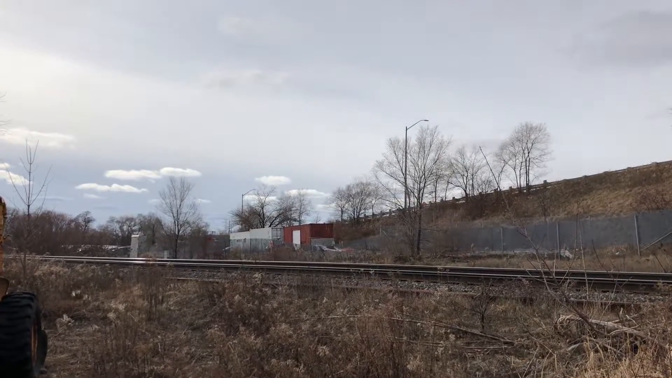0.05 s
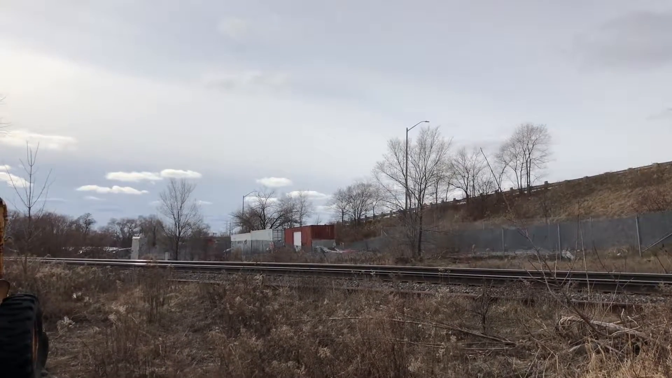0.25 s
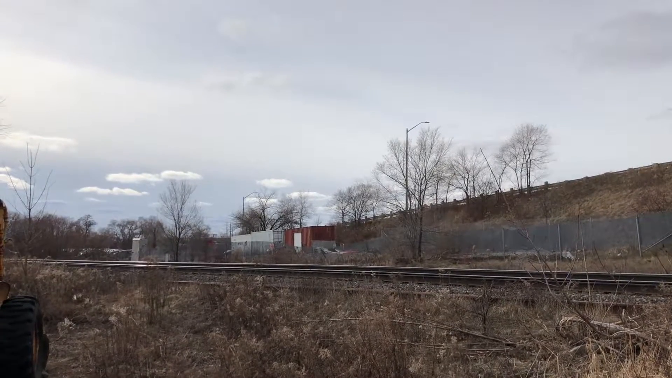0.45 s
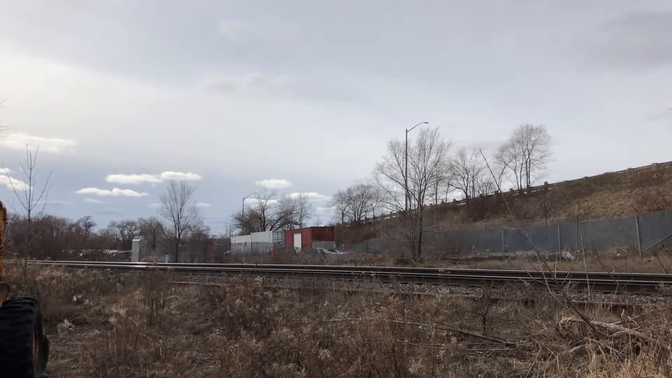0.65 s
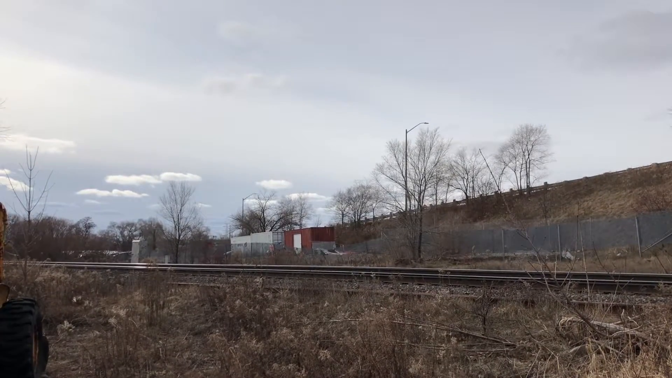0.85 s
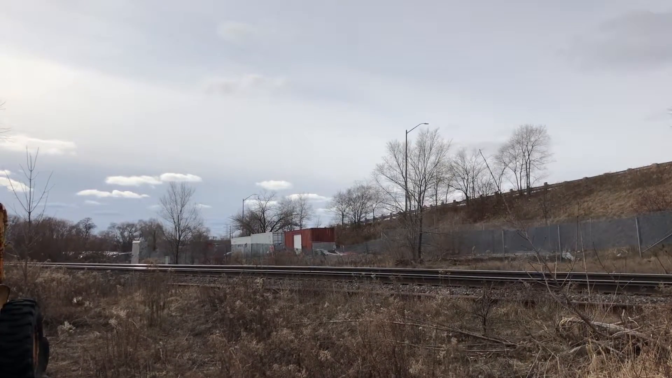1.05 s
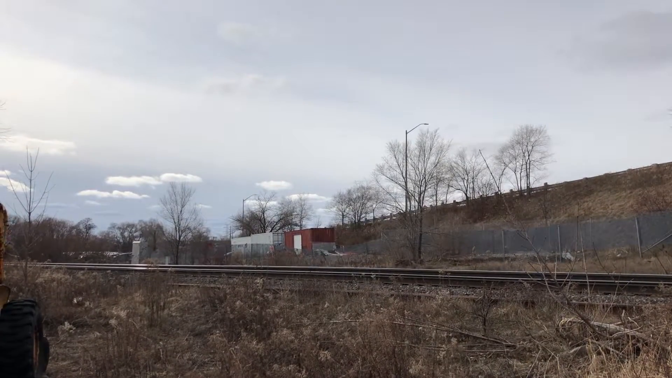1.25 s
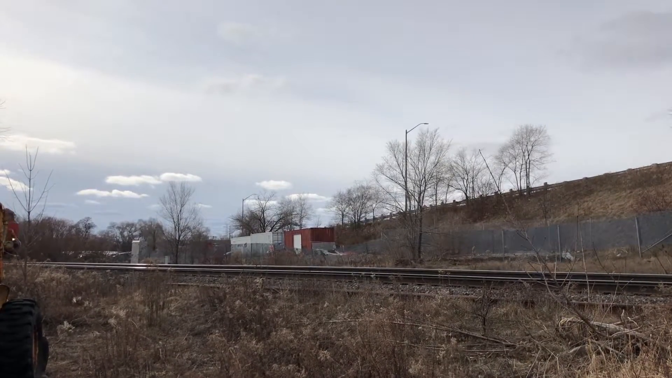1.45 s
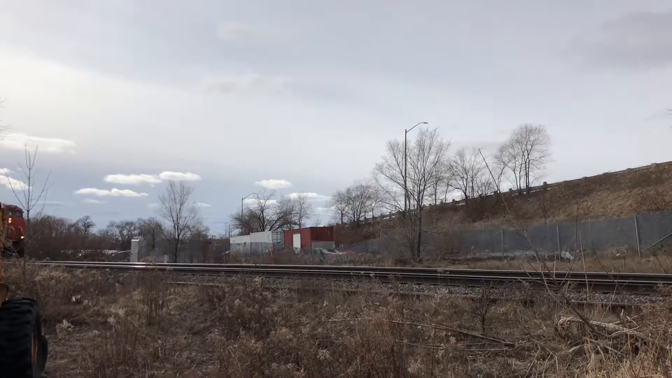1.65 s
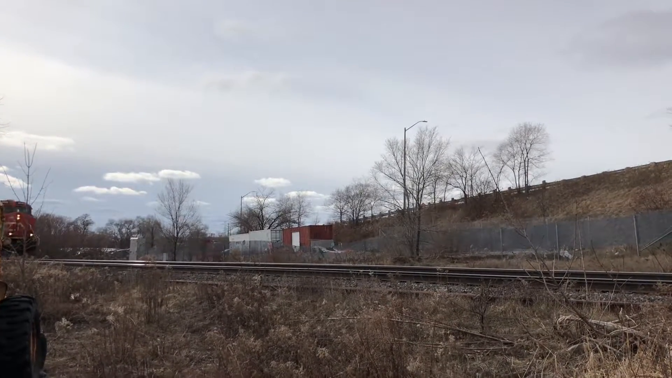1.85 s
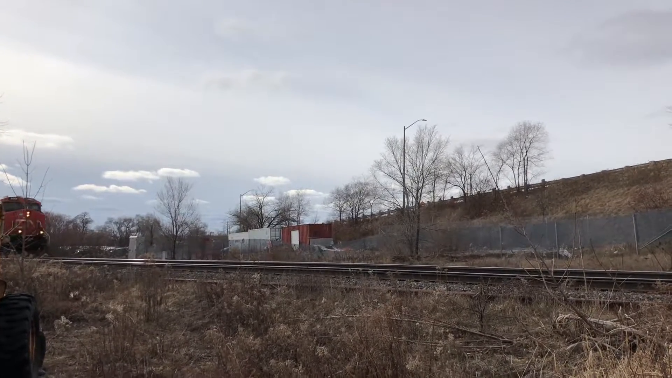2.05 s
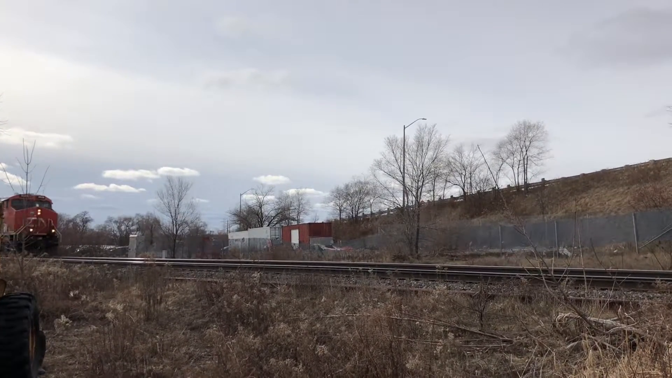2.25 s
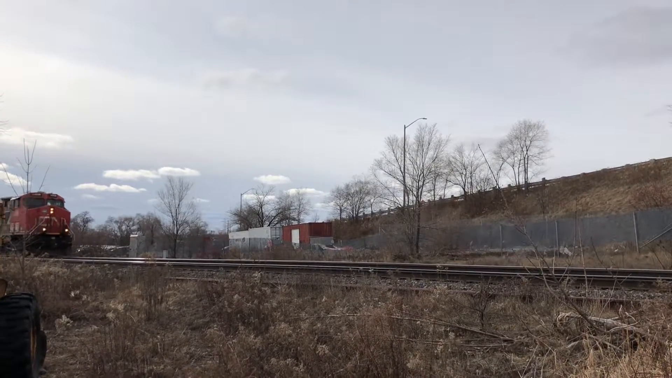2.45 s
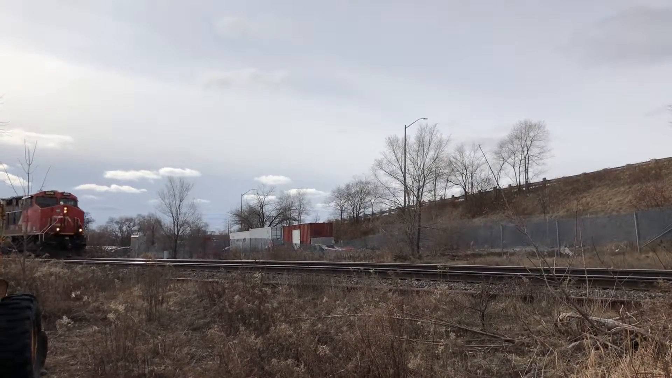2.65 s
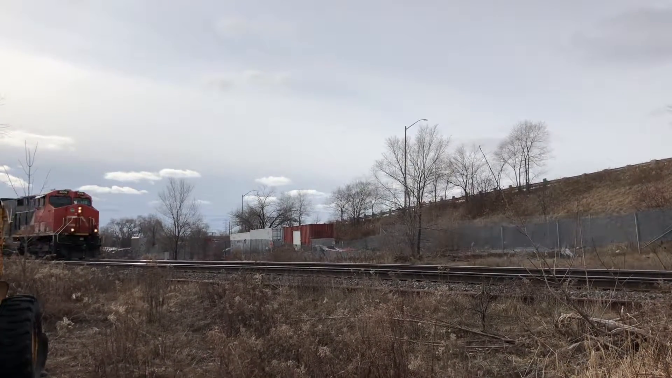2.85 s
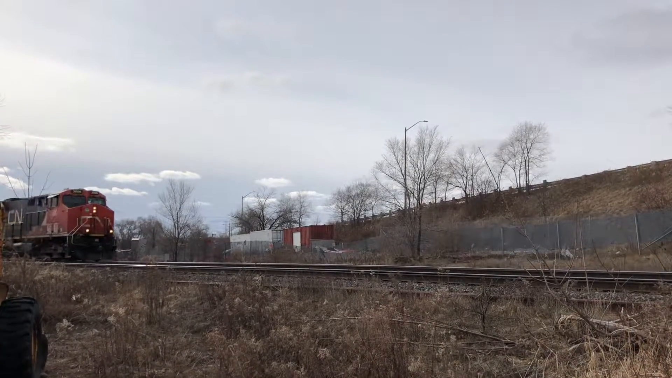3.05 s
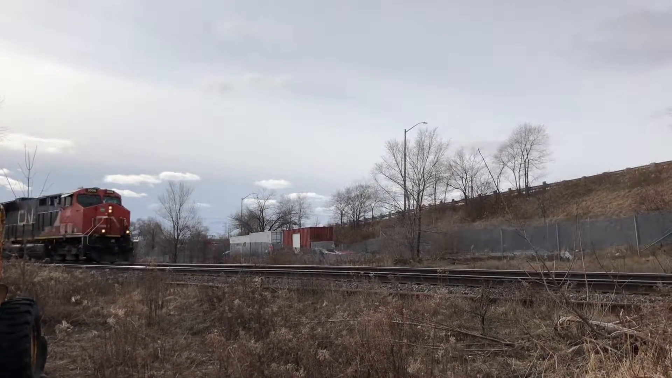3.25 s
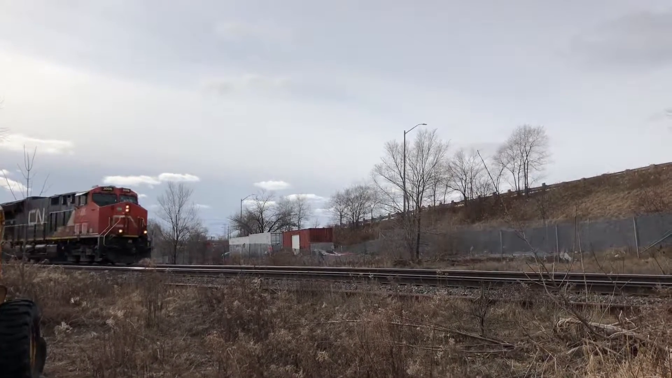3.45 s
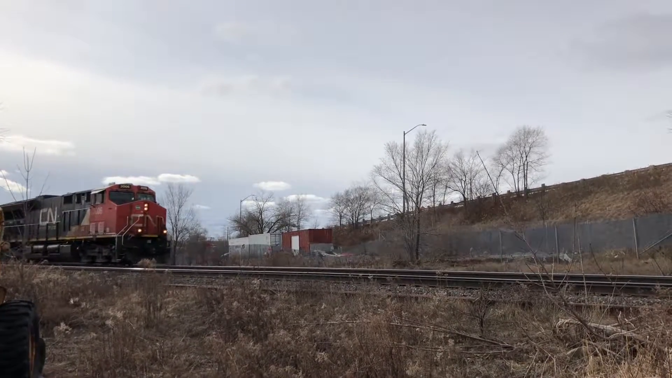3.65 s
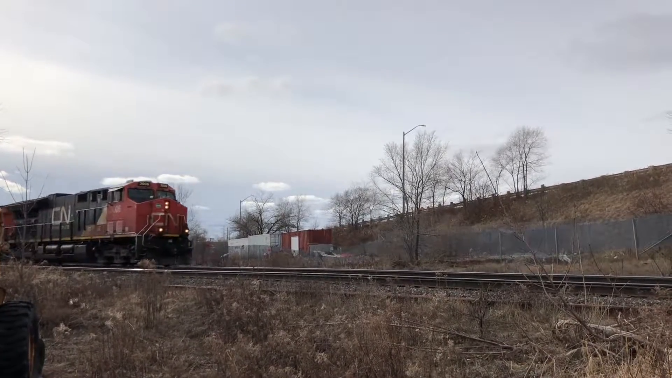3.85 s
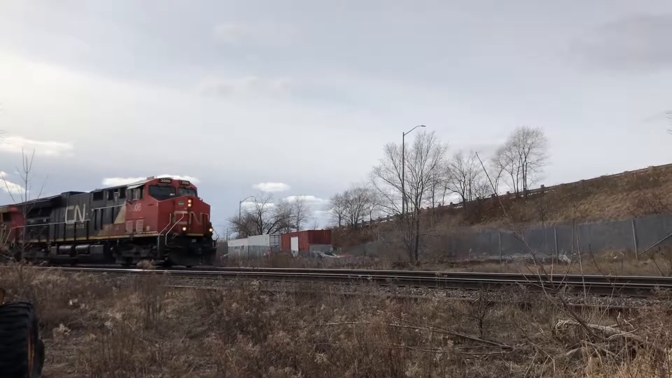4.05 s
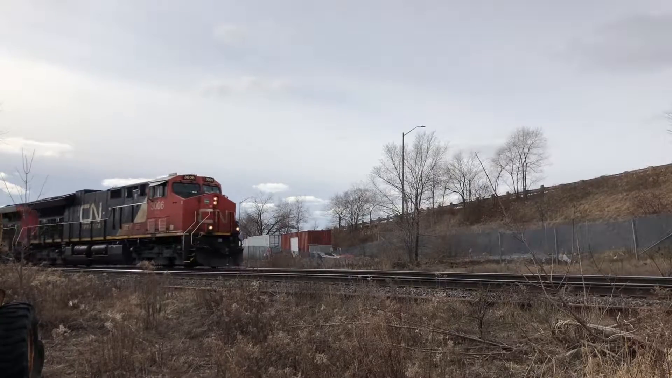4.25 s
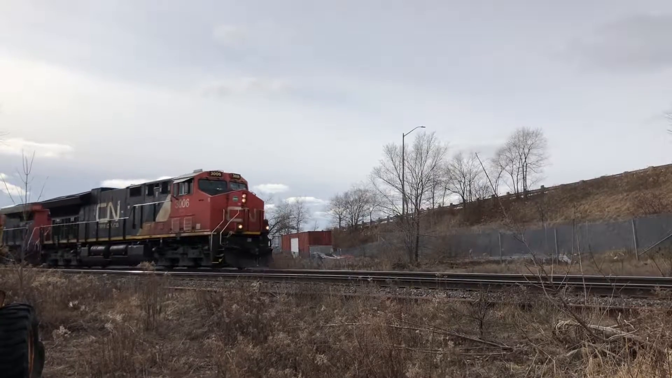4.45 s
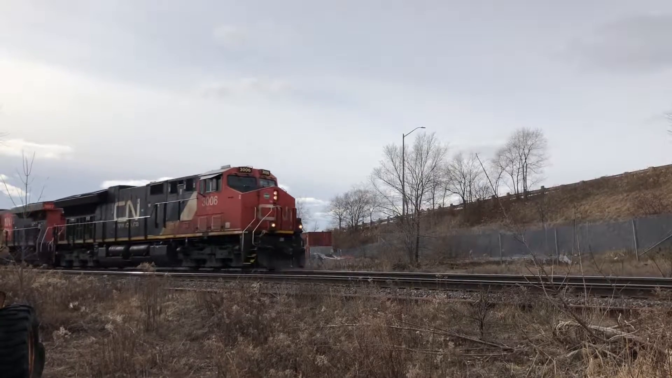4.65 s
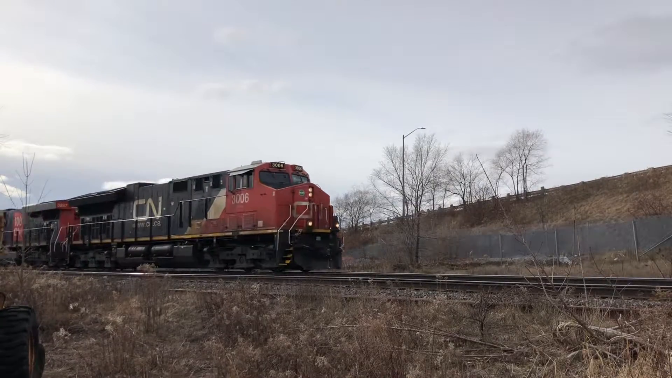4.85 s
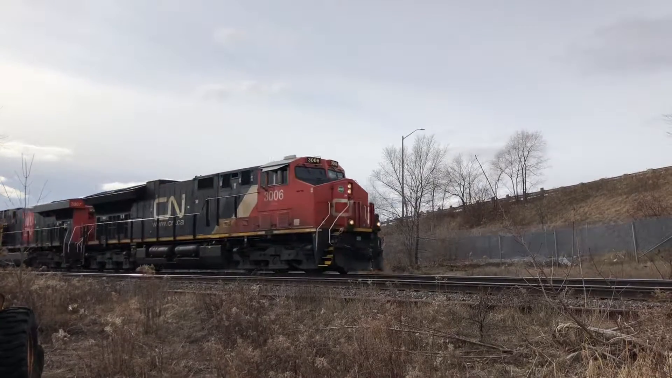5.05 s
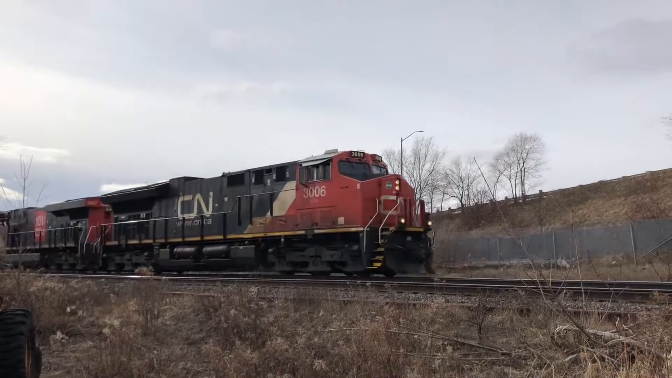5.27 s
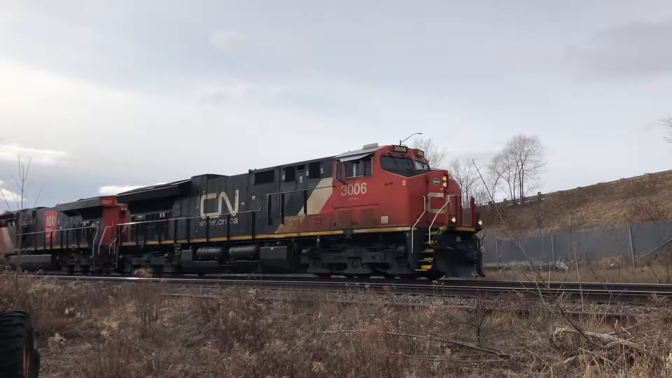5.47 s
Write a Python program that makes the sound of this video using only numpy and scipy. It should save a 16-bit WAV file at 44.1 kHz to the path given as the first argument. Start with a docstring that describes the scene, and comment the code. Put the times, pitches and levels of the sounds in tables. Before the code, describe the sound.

From 0 s, two diesel freight locomotives throb down the track, slightly muffled by cover until about 0.6 s. Their low, uneven exhausts run at different speeds and beat together. Over them lie a fluttering, several-toned blower whine, mostly mid to high, and a broad roar of air. A soft, breathy puff close by begins around 0.4 s, peaks near 0.6 s and fades; at 0.9 s comes one short, hoarse squeak falling in pitch. A thin, very high hiss comes and goes, almost vanishing around 3 s and returning at 3.5 s. The whole train grows steadily louder and brighter, with the whine surging around 3.5 and 4.6 s. Wheel hiss and fine rattle rise fastest. Faint, very high squeals appear from 3.6 s, and bright rail scuffs cluster from 4.9 to 5.4 s. The open-air trackside sound ends at about 5.5 s, near its loudest, before the engine draws level.

```python
"""The throb of two diesel freight locomotives comes first, far down the track; under load they approach from cover.
The exhausts turn at different speeds and beat; blowers geared to the leading engine whine over a roar of air.
Most of it swells as the distance to the microphone shrinks, the hiss and rattle of steel wheels fastest.
Early on comes a soft puff of air, close by, then one hoarse squeak falls in pitch.
A thin high hiss comes and goes; later the wheels squeal faintly and scuff the rail.
"""
import sys
import numpy as np
from scipy import signal
from scipy.fft import rfft, irfft
from scipy.io import wavfile

SR = 44100
rng = np.random.default_rng(int(sys.argv[2]) if len(sys.argv) > 2 else 0)


def int16_out(signal):
    """Quantize to a 16-bit WAV file."""
    q = np.round(np.clip(np.atleast_2d(signal).T, -1, 1) * 32767)
    wavfile.write(sys.argv[1], SR, q.astype(np.int16))


N = 242991
TIME = np.arange(N) / SR

# Leading engine, settling under load. Each row: time in seconds, four-stroke cycles per second in Hz.
LEAD_SPEED = [(0, 7.86), (.8, 7.91), (1.6, 7.985), (5.5, 7.955)]
# Second engine, turning slower. Each row: time in seconds, four-stroke cycles per second in Hz.
TRAIL_SPEED = [(0, 6.89), (3, 6.895), (5.5, 6.86)]

# distance from microphone to track (m); blower level there (dB) and its loss over the ground (dB per metre)
TRACK_M, BLOWER_DB, BLOWER_LOSS_DB_PER_M = 15.33, -18.5, 0.0625


def engines(lead_db=-3, trail_db=-5.5, rumble_db=-11.0, trail_lag_db=-3, boom_hz=93, boom_width_hz=4, boom_db=-13):
    """Both exhausts, the turbulent rumble of their stacks and a surging boom; the farther engine grows more slowly."""
    # Leading exhaust's tones; twelve cylinders fire at multiple 12. Each row: multiple of cycle rate, level in dB.
    lead_orders = [(6, -30), (7, -38), (9, -27), (10, -33), (11, -29), (12, -22), (13, -30), (14, -33),
                   (15, -22), (16, -35), (17, -39), (18, -33), (19, -40), (20, -38), (21, -32), (22, -39),
                   (24, -42), (26, -38), (27, -34), (28, -35), (29, -39), (31, -47), (32, -46), (46, -47)]
    # Second exhaust's tones. Each row: multiple of cycle rate, level in dB.
    trail_orders = [(6, -36), (7, -36), (9, -27), (10, -34), (12, -28), (13, -34), (14, -32), (15, -25),
                    (17, -35), (18, -38), (19, -37), (20, -41), (21, -37), (30, -38), (31, -42)]
    # Spectrum of the stacks' rumble. Each row: frequency in Hz, relative level in dB per Hz.
    rumble_spectrum = [(15, -38), (33, -33), (45, -12), (70, -7.5), (100, 2.5), (135, -4), (180, -9.5),
                       (220, -6.5), (260, -15), (330, -11), (400, -18.5), (450, -52), (1200, -55.5)]
    # All the engine sound swells for a moment. One row: peak in seconds, half length in seconds, rise in dB.
    engine_swell = (3.33, 0.18, 1)
    track_db, shadow_db = -12, -0.5  # level at the distance of the track; shadow of the cover at the start

    lead = exhaust(LEAD_SPEED, lead_orders, waver=0.17, waver_hz=2.0, smear=0.8)
    trail = exhaust(TRAIL_SPEED, trail_orders, waver=0.22, waver_hz=1.5, smear=1.0)
    far = gain_of(trail_db) * trail + gain_of(boom_db) * fuzzy(boom_hz, boom_width_hz)
    far = far * gain_of(trail_lag_db * TIME / TIME[-1])
    rumble = coloured(rng.standard_normal(N) * throb(depth=0.51, order=3), rumble_spectrum)
    level_db = track_db + spreading() + swell(*engine_swell) + shadow_db * cover()
    return gain_of(level_db) * (gain_of(lead_db) * lead + far + gain_of(rumble_db) * rumble)


def exhaust(speed, orders, waver, waver_hz, smear):
    """Unequal cylinders repeat once a cycle, so multiples of the cycle rate sound; each wavers in the air."""
    # The upper tones rise and fall once.
    # One row: lowest multiple of cycle rate, peak in seconds, half length in seconds, rise in dB.
    bark_from, *bark = (25, 4.62, 0.83, 2.9)
    turns = np.cumsum(curve(speed)) / SR + rng.random()
    out = np.zeros(N)
    for order, db in orders:
        lag = smear * rng.random()  # pipes and ground echoes smear the pulses
        tone = np.exp(2j * np.pi * (order * turns + lag))
        wavering = 1 + waver * (drift(waver_hz) + 1j * drift(waver_hz))
        bark_db = swell(*bark) * (order >= bark_from)
        out += gain_of(db + bark_db) * (tone * wavering).real
    return evened(out)


def throb(depth, order):
    """Gas leaves the leading engine in puffs, a few to each cycle, so level pulses at that multiple."""
    return 1 + depth * np.cos(2 * np.pi * order * np.cumsum(curve(LEAD_SPEED)) / SR)


def blowers(flutter=0.39, flutter_hz=14, roar_db=-3, gust_db=0.76, gust_hz=13.0):
    """Blade tones follow the engine and flutter in moving air, in skirts of scattered sound, over airflow roar."""
    # Blade whine. Each row: multiple of blade rate, clean tone in dB, scattered skirt in dB,
    # skirt centre in Hz (at the engine's last speed), skirt width in Hz.
    whine_rows = [(1, -24, -28.5, 310, 18), (2, -18, -13, 655, 83), (3, -13, -12.5, 947, 78),
                  (4, -11, -11.5, 1270, 62), (5, -26.5, -21, 1590, 37), (6, -28, -21.5, 1890, 34),
                  (7, -31.5, -23.5, 2215, 40)]
    # Blade tones leave in beams that sweep past as the blower moves.
    # Each row: multiple of blade rate, peak in seconds, half length in seconds, rise in dB.
    beams = [(3, 3.49, .17, 7), (3, 4.62, 0.51, 6), (3, 5.33, 0.1, 2.5), (4, 3.64, 0.82, 3.5),
             (4, 5.45, 0.025, 5)]
    # Spectrum of the airflow's roar. Each row: frequency in Hz, relative level in dB per Hz.
    roar_spectrum = [(150, -14), (350, -4), (520, 1.5), (700, -0.5), (820, 0), (1100, -2.5), (1400, -1.5),
                     (1850, -5), (2050, -9), (2400, -15), (2750, -20), (4000, -14), (9000, -33)]
    blades_per_cycle = 40.18
    clean_db, scatter_db_per_m = 2.5, 0.08  # clean tones: boost when near, share lost to scattering
    bright_db, bright_loss_db_per_m = 1.6, 0.17  # upper whine: boost when near, loss on the way
    roar_loss_db_per_m = 0.0458  # further loss on the roar
    shadow_db, shadow_clean_db = 0.5, -16  # effect of the cover at the start: on everything, on the clean tones

    speed = curve(LEAD_SPEED)
    phase = 2 * np.pi * np.cumsum(blades_per_cycle * speed) / SR
    skirt_phase = 2 * np.pi * np.cumsum(speed / speed[-1]) / SR
    hidden = cover()
    clarity = gain_of(clean_db - loss(scatter_db_per_m) + shadow_clean_db * hidden)
    brightness = gain_of(bright_db - loss(bright_loss_db_per_m))

    whine = np.zeros(N, complex)
    for order, tone_db, skirt_db, skirt_hz, width_hz in whine_rows:
        fading = evened(1 + flutter * (drift(flutter_hz) + 1j * drift(flutter_hz)))
        tone = gain_of(tone_db) * clarity * fading * np.exp(1j * order * phase)
        scatter = evened(drift(width_hz / 2) + 1j * drift(width_hz / 2))
        skirt = gain_of(skirt_db) * scatter * np.exp(1j * skirt_hz * skirt_phase)
        beam_db = sum(swell(*beam) for beam_order, *beam in beams if beam_order == order)
        whine += gain_of(beam_db) * (tone + skirt) * (brightness if skirt_hz > 1000 else 1)

    roar = coloured(rng.standard_normal(N) * throb(depth=0.053, order=3), roar_spectrum)
    roar = roar * gain_of(roar_db - loss(roar_loss_db_per_m) + gust_db * drift(gust_hz))
    level_db = BLOWER_DB + spreading() - loss(BLOWER_LOSS_DB_PER_M) + shadow_db * hidden ** 2
    return gain_of(level_db) * (np.sqrt(2) * whine.real + roar)


def wheels(rattles_per_s=30, rattle_s=0.0019, rattle_db=-13, shimmer_db=0.9, shimmer_hz=19.0, top_hz=6500):
    """Steel rolling on steel hisses; short rattles and the top treble stand out only at close range."""
    # The wheels hiss harder on some stretches. Each row: peak in seconds, half length in seconds, rise in dB.
    rough_rail = [(2.8, 0.21, 2), (5.06, 0.17, 1)]
    # Spectrum of the rolling. Each row: frequency in Hz, relative level in dB per Hz.
    rail_spectrum = [(1500, -39), (2900, -26), (3100, -2), (3550, -6), (3900, -2), (5300, -3.5), (5900, -7),
                     (6450, -11.5), (7400, -7.5), (9300, -13), (10800, -16.5), (13000, -16), (16000, -23)]
    # Top treble sizzles more or less from one stretch of rail to the next.
    # Each row: peak in seconds, half length in seconds, change in dB.
    sizzles = [(2, .55, 5), (2.902, .3, 2), (5.47, 0.18, -3)]
    track_db, loss_db_per_m = -28.5, 0.23  # level at the distance of the track; loss over the ground
    treble_db, treble_loss_db_per_m = 1, 0.22  # top treble: boost when near, loss on the way
    treble_shadow_db = -9  # shadow of the cover on the top treble at the start

    level_db = track_db + spreading() - loss(loss_db_per_m) + sum(swell(*row) for row in rough_rail)
    knocks = (rng.random(N) < rattles_per_s / SR) * rng.uniform(0.18, 1, N)
    bursts = evened(signal.lfilter([1], [1, -np.exp(-1 / (rattle_s * SR))], knocks))
    rattle = gain_of(rattle_db + (level_db - level_db.max()) / 2) * bursts * rng.standard_normal(N)
    hiss = rng.standard_normal(N) * throb(depth=0.04, order=3)  # pulses slightly with the leading engine
    rolling = coloured(hiss + rattle, rail_spectrum)

    highpass = signal.butter(2, top_hz, "high", fs=SR, output="sos")
    top = signal.sosfiltfilt(highpass, rolling)
    top_db = treble_db - loss(treble_loss_db_per_m) + treble_shadow_db * cover()
    top_db = top_db + sum(swell(*row) for row in sizzles)
    rolling = rolling + (gain_of(top_db) - 1) * top
    return rolling * gain_of(level_db + shimmer_db * drift(shimmer_hz))


def scuffs(half_s=0.0074):
    """Now and then a wheel scuffs the rail with a brief, bright rasp."""
    # Each row: peak in seconds, level in dB.
    scuff_times = [(1.19, -57), (1.28, -57), (1.43, -56), (1.5, -55), (3.65, -44), (3.96, -47), (4.63, -44),
                   (4.885, -37), (5.0, -38), (5.137, -37), (5.345, -35), (5.386, -34)]
    # Spectrum of the rasp. Each row: frequency in Hz, relative level in dB per Hz.
    scuff_spectrum = [(2000, -30), (3800, -2), (6000, -4), (7800, 0), (10000, -5), (15000, -14)]
    level = sum(gain_of(db) * bump(at, half_s) for at, db in scuff_times)
    return coloured(rng.standard_normal(N), scuff_spectrum) * level


def squeals():
    """Flanges rub the rail and make the wheels sing faintly, very high."""
    # Each row: peak in seconds, half length in seconds, pitch in Hz, width in Hz, level in dB.
    squeal_rows = [(3.6, .07, 14000, 70, -53), (3.85, .25, 12520, 70, -54), (3.9, .45, 13200, 150, -59),
                   (4.03, 0.15, 9980, 450, -55), (4.4, .15, 14020, 60, -55), (4.5, 0.3, 10000, 450, -56),
                   (5.18, .13, 10050, 550, -46)]
    return sum(gain_of(db) * bump(at, half_s) * fuzzy(hz, width_hz)
               for at, half_s, hz, width_hz, db in squeal_rows)


def side_whines(flutter=0.36, flutter_hz=8, pulsing=0.9):
    """Other fans and gears fade in and out, pulse with the second engine's cycle and beat against the blade tones."""
    # Each row: pitch in Hz, loudest at in seconds, half length in seconds, level in dB against the blowers.
    side_rows = [(668, 1.7, 1.6, -11.5), (662, 3.3, 1.1, -13.5), (648, 4.5, .9, -15), (921, .85, .35, -10),
                 (932, 2.9, 1.1, -13), (947, 1.2, .5, -13), (946, 4.3, 1.2, -14), (1255, .5, .6, -13),
                 (1240, 1.6, 1.6, -13), (1265, 3.3, 1.4, -8.5), (1273, 3.9, .7, -12), (1296, 3.8, 1, -15)]
    turns = np.cumsum(curve(TRAIL_SPEED)) / SR
    out = np.zeros(N)
    for hz, at, half_s, db in side_rows:
        fading = 1 + flutter * (drift(flutter_hz) + 1j * drift(flutter_hz))
        fading = fading * (1 + pulsing * np.cos(2 * np.pi * (turns + rng.random())))
        tone = np.exp(2j * np.pi * (hz * TIME + rng.random()))
        out += gain_of(db) * bump(at, half_s) * evened((fading * tone).real)
    return out * gain_of(BLOWER_DB + spreading() - loss(BLOWER_LOSS_DB_PER_M))


def hum(pitch_hz=315, flutter=0.36, flutter_hz=8, track_db=-36.5):
    """The low tone of a cooling fan wavers and now and then swells."""
    # Each row: peak in seconds, half length in seconds, rise in dB.
    fan_swells = [(.2, 0.25, 8), (2.003, 0.46, 3), (4.197, 0.076, 7.5), (4.96, 0.082, 11.5),
                  (5.293, 0.08, 16.5)]
    fading = 1 + flutter * (drift(flutter_hz) + 1j * drift(flutter_hz))
    level_db = track_db + spreading() + sum(swell(*row) for row in fan_swells)
    return gain_of(level_db) * evened((fading * np.exp(2j * np.pi * pitch_hz * TIME)).real)


def air_puff(waver_db=1.0, waver_hz=14):
    """A soft puff of air close by: a breathy body, and a fine spray that builds later and fades sooner."""
    # Spectrum of the breathy body. Each row: frequency in Hz, relative level in dB per Hz.
    body_spectrum = [(700, -20), (1200, 2), (1900, -0.5), (2500, -9), (3100, -1.5), (3600, 0), (4200, -2.5),
                     (4700, -13), (7000, -16), (9000, -30), (14000, -50)]
    # Spectrum of the fine spray. Each row: frequency in Hz, relative level in dB per Hz.
    spray_spectrum = [(2500, -30), (4500, -1), (7000, 0), (8500, -5), (10000, -6), (11800, -9),
                      (14000, -22)]
    body = puff_layer(body_spectrum, level_db=-43.0, attack_s=0.12, fade_db_per_s=25)
    spray = puff_layer(spray_spectrum, level_db=-50.0, attack_s=0.2, fade_db_per_s=49)
    return body * gain_of(waver_db * drift(waver_hz)) + spray


def puff_layer(spectrum, level_db, attack_s, fade_db_per_s, start_s=0.42, fade_from_s=0.65):
    """A puff of air, made of coloured noise, swells smoothly and then dies away."""
    rise = np.sin(np.pi / 2 * np.clip((TIME - start_s) / attack_s, 0, 1)) ** 2
    fade_db = fade_db_per_s * np.maximum(TIME - fade_from_s, 0)
    return coloured(rng.standard_normal(N), spectrum) * rise * gain_of(level_db - fade_db)


def chirp(at=0.925, half_s=0.063, pitch_hz=1620, fall_hz_per_s=1500, width_hz=380, level_db=-41.5):
    """One short, hoarse, falling squeak: a narrow band of noise gliding down."""
    return gain_of(level_db) * bump(at, half_s) * fuzzy(pitch_hz - fall_hz_per_s * (TIME - at), width_hz)


def thin_hiss(flicker_db=0.7, flicker_hz=15):
    """A thin hiss of noise at the top of the treble that comes and goes."""
    # Each row: time in seconds, level in dB.
    thin_level = [(0.0, -53), (0.4, -48), (0.62, -48), (0.87, -45), (1.26, -52.5), (2.07, -46.5),
                  (2.65, -52), (2.7, -59), (2.91, -72), (2.94, -58), (3.1, -70), (3.35, -75), (3.37, -52),
                  (3.52, -53), (3.57, -41), (3.82, -44), (4.48, -42), (4.79, -47.5), (5.51, -46)]
    # Spectrum of the hiss. Each row: frequency in Hz, relative level in dB per Hz.
    thin_spectrum = [(7000, -34), (11000, -27), (12500, -8), (14000, 2.5), (15500, 6), (16500, -5)]
    level_db = curve(thin_level) + flicker_db * drift(flicker_hz)
    return coloured(rng.standard_normal(N), thin_spectrum) * gain_of(level_db)


def ground(x, dip_hz=460, far_db=-7, near_db=1.0, sharpness=7.0):
    """The echo off soft ground cancels a low band while the train is far; the dip fills as it nears."""
    band = signal.filtfilt(*signal.iirpeak(dip_hz, sharpness, fs=SR), x)
    return x + (gain_of(np.linspace(far_db, near_db, N)) - 1) * band


def cover(open_s=0.63):
    """How far the train is still behind cover: 1 at first, 0 once in the open."""
    return np.maximum(1 - TIME / open_s, 0)


def distance(train_m_per_s=14.35, abreast_s=6.093):
    """Metres from microphone to train, at steady speed on a straight track; it would draw level at abreast_s."""
    return np.hypot(TRACK_M, train_m_per_s * (abreast_s - TIME))


def loss(db_per_m):
    """Decibels lost on the part of the path that exceeds the distance of the track."""
    return db_per_m * (distance() - TRACK_M)


def spreading():
    """Sound pressure falls as one over the distance: dB against the distance of the track."""
    return 20 * np.log10(TRACK_M / distance())


def swell(at, half_s, rise_db):
    """A smooth rise and fall, in dB."""
    return rise_db * bump(at, half_s)


def bump(at, half_s):
    """A smooth rise to 1 and fall back to 0."""
    return np.exp(-((TIME - at) / half_s) ** 2)


def gain_of(db):
    """Amplitude factor for a level in dB."""
    return 10 ** (np.asarray(db) / 20)


def evened(x):
    """Scales x to rms 1."""
    return x / np.sqrt(np.mean(abs(x) ** 2) + 1e-20)


def curve(rows):
    """The second column of a table against its first (seconds), joined by straight lines."""
    seconds, values = np.transpose(rows)
    return np.interp(TIME, seconds, values)


def coloured(x, spectrum):
    """Gives x a spectrum, at rms 1."""
    hz, db = np.transpose(spectrum)
    bins = np.fft.rfftfreq(N, 1 / SR)
    shape = gain_of(np.interp(np.log(bins + 1), np.log(hz), db))
    return evened(irfft(rfft(x) * shape, N))


def drift(rate_hz, size=2048):
    """Slow random wander of rms about 1, up to about rate_hz."""
    bins = np.fft.rfftfreq(size, N / SR / size)
    slow = irfft(rfft(rng.standard_normal(size)) / (1 + (bins / rate_hz) ** 4))
    return np.interp(TIME, np.linspace(0, N / SR, size), evened(slow))


def fuzzy(hz, width_hz):
    """A band of noise of rms 1 round a pitch, which may glide."""
    scatter = drift(width_hz / 2, size=16384) + 1j * drift(width_hz / 2, size=16384)
    turns = np.cumsum(hz * np.ones(N)) / SR
    return evened((scatter * np.exp(2j * np.pi * turns)).real)


def scene():
    """The approaching train, heard from beside the track."""
    motors = ground(engines() + blowers()) + side_whines() + hum()
    running_gear = wheels() + scuffs() + squeals()
    return (motors + running_gear + air_puff() + chirp() + thin_hiss())[None]


def record(dry, edge_hz=15780):
    """The recorder's band limit: a steep lowpass."""
    lowpass = signal.firwin(1023, edge_hz, window=("kaiser", 9), fs=SR)
    return signal.oaconvolve(dry, lowpass[None], "same")


dry = scene()
out = record(dry)
int16_out(out)
```